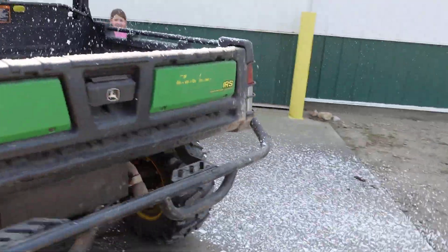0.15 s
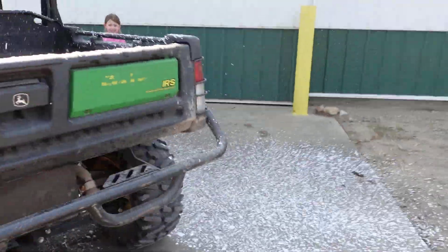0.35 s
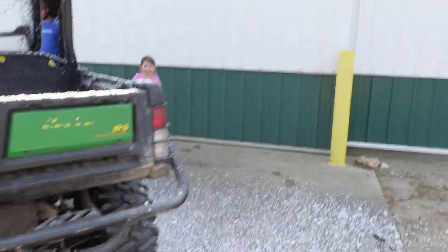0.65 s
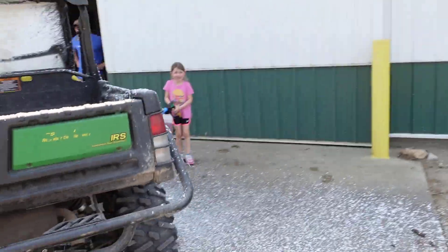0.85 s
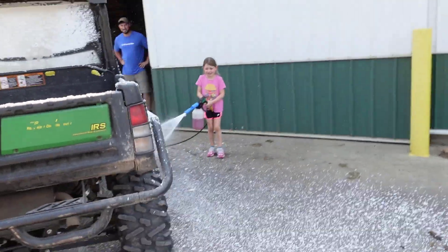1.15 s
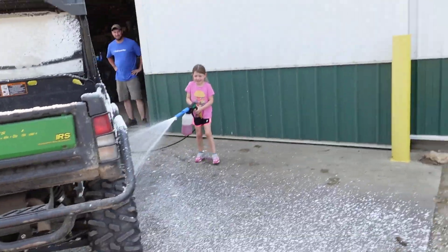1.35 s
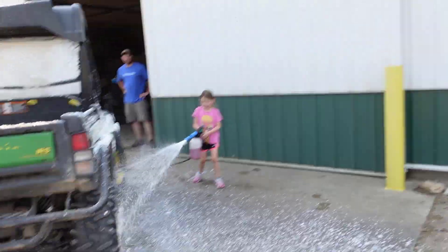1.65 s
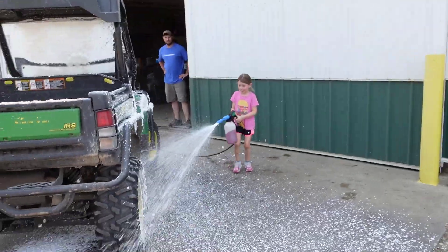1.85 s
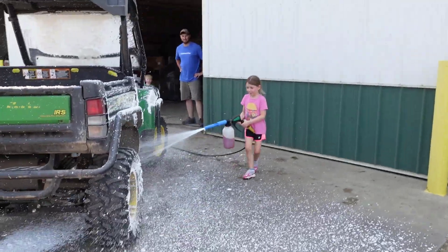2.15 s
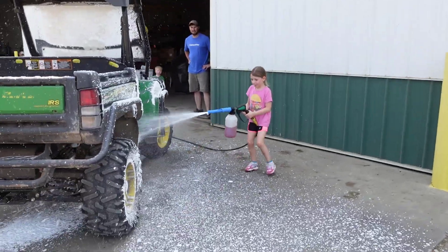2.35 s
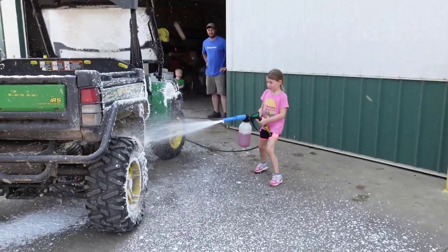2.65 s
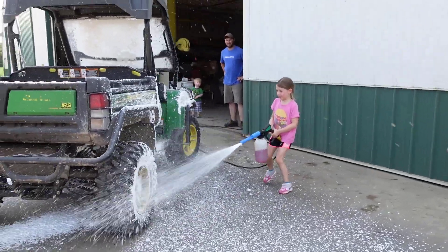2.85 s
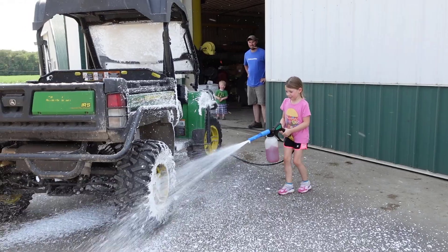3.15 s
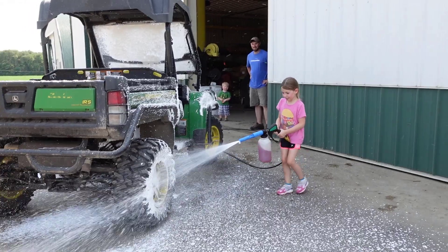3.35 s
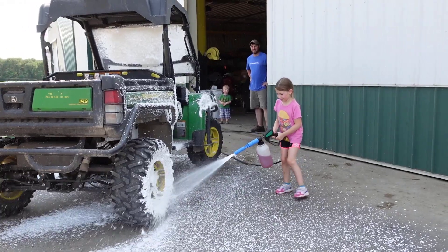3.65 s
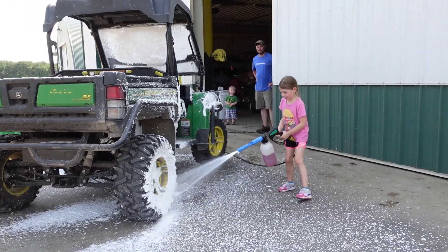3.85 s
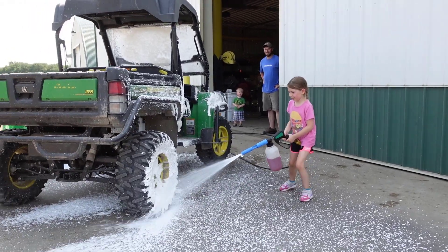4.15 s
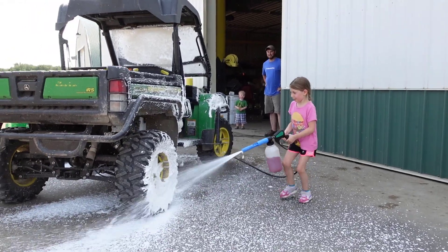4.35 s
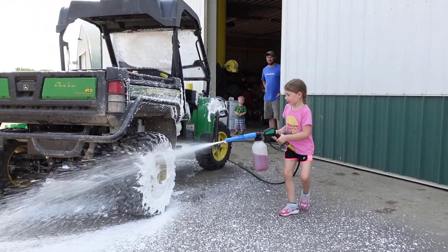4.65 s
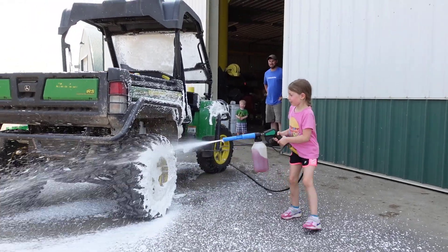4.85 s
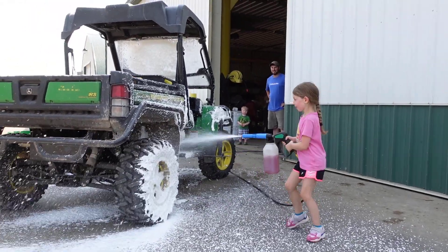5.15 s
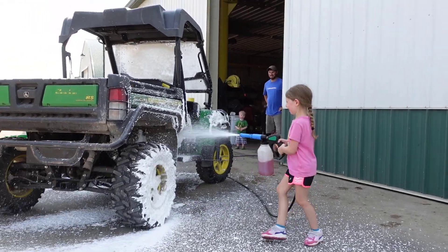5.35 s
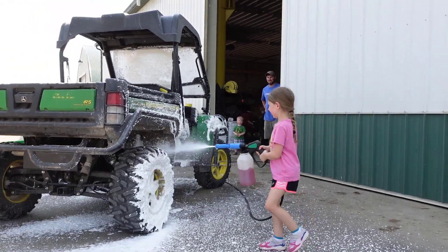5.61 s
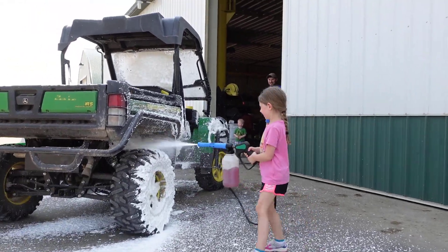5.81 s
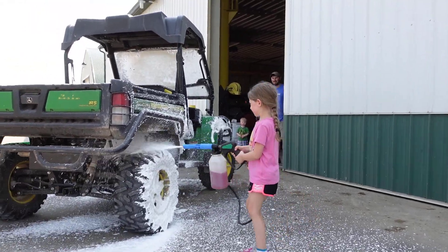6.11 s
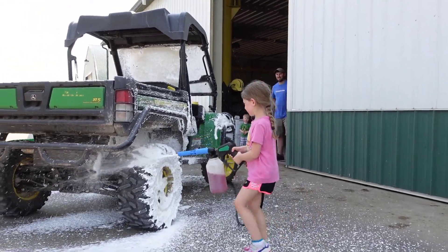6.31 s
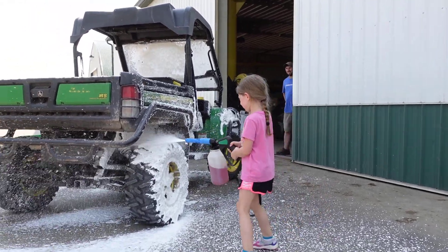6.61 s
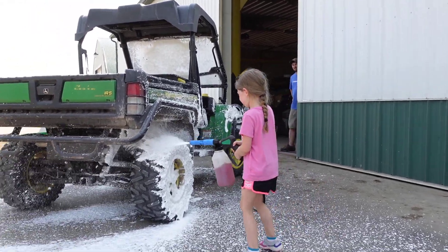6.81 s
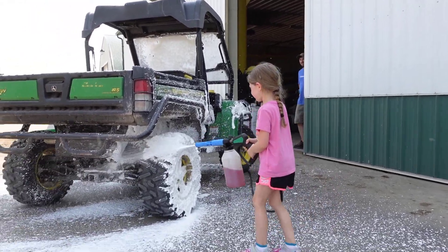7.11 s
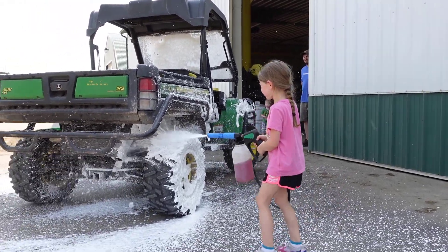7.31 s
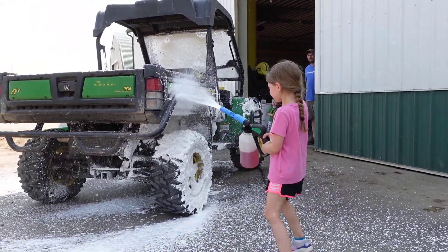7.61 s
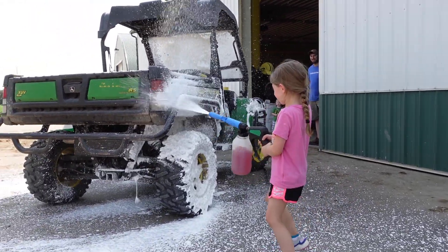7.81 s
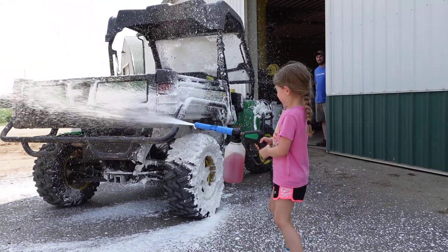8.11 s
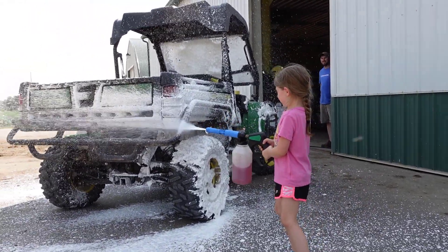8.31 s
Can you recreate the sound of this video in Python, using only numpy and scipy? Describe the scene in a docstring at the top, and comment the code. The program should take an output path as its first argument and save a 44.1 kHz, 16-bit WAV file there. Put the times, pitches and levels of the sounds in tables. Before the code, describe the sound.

A pressure washer's foam lance sprays without pause in a concrete yard, heard a few steps away. Bright hiss and fine fizzing mist dominate, soon roughened by a rapid pump sputter. The water splatters over tyres and plastic panels, with small foam slaps, brief hollow drumming and slight dips when the jet misses. Near reflections give a subtle gliding, phasey colour; the stereo image is nearly central.

```python
"""A concrete yard: a pressure washer's foam lance sweeps over a utility vehicle, a few steps from two microphones.
Pump spurts and uneven clots modulate random drops, filtered into the jet's hiss and its fizzing mist.
Where the jet lands, random drops splash on tyres and panels, drum on hollow plastic and ring resonances.
Three gliding near reflections comb the sound; longer, drifting ones fill the yard and its stereo sides."""
import sys
import numpy as np
from scipy import signal
from scipy.fft import rfft, irfft, next_fast_len
from scipy.io import wavfile
from scipy.ndimage import uniform_filter1d, map_coordinates

SR = 44100
rng = np.random.default_rng(int(sys.argv[2]) if len(sys.argv) > 2 else 0)


def wrap_up_sound(samples):
    """Save the sound to the file named by the first command line argument, as 16-bit audio."""
    columns = np.atleast_2d(samples).T
    # keep every value between -1 and 1, then stretch to whole-number steps
    tamed = np.clip(columns, -1, 1)
    steps = np.round(tamed * 32767).astype(np.int16)
    wavfile.write(sys.argv[1], SR, steps)


N = 373527  # samples

# Sound from the sides. Its tone: pitch_hz, gain_db
SIDE_TONE = [(150, -37), (500, -22), (1100, -35.5), (1900, -63), (3000, -58), (4300, -13), (7000, -12),
             (11000, -12.5), (15000, -30)]
# Its gain before that tone: time_s, gain_db
SIDE_GAIN = [(0, 0.5), (.6, -5.5), (1.3, -14), (2, -7), (5, -7), (5.45, -4), (5.9, -8), (8.47, -6.5)]

# The strongest near reflection, later as the lance is raised: time_s, delay_ms, strength (0-1)
BOUNCE_PATH = [(0, 1.34, .04), (.9, 1.27, .08), (1.0, 1.21, .22), (1.18, 1.155, .28), (1.3, 1.21, .3),
               (1.42, 1.24, .3), (1.58, 1.2, .3), (1.74, 1.2, .3), (1.92, 1.245, .25), (2.05, 1.18, .2),
               (2.16, 1.08, .23), (2.26, 1.1, .21), (2.5, 1.34, .25), (2.6, 1.38, .28), (2.7, 1.34, .28),
               (2.82, 1.21, .25), (2.98, 1.12, .27), (3.22, 1.21, .24), (3.42, 1.16, .13), (3.75, .81, .08),
               (4.28, .79, .13), (4.64, 1.08, .19), (4.88, 1.135, .17), (5.06, 1.08, .14),
               (5.35, 1.18, .13), (5.74, 1.14, .08), (6.05, 1.12, .12), (6.55, 1.06, .09), (7.3, .99, .15),
               (7.5, 1.03, .1), (7.56, 1.62, .1), (7.8, 1.8, .22), (8.1, 1.81, .29), (8.47, 1.6, .18)]
# A shorter path off the vehicle's flank, bending as the lance swings: time_s, delay_ms, strength (0-1)
FLANK_PATH = [(0, .7, .06), (.72, 1.01, .06), (1.8, 1.06, .08), (1.97, 1.0, .12), (2.4, 1.15, .04),
              (2.85, 1.05, .1), (3.1, .98, .08), (3.35, .87, .12), (3.6, .69, .11), (4.2, .5, .08),
              (4.55, .7, .14), (4.78, .935, .2), (4.9, .925, .2), (5.1, .85, .22), (5.33, 1.02, .1),
              (5.74, .98, .11), (6.03, 1.11, .06), (6.42, .99, .09), (6.7, .85, .02), (8.47, .6, .05)]
# A longer, duller path off the wet concrete: time_s, delay_ms, strength (0-1)
GROUND_PATH = [(0, 1.6, .04), (1.1, 1.74, .09), (1.7, 1.76, .09), (2.3, 1.55, .06), (2.9, 1.58, .07),
               (3.05, 1.49, .14), (3.7, 1.35, .07), (4.3, 1.0, .1), (4.76, 1.23, .17), (5.2, 1.24, .12),
               (5.45, 1.3, .14), (5.75, 1.27, .11), (6.02, 1.37, .08), (6.36, 1.26, .15), (7.15, 1.29, .16),
               (7.48, 1.32, .05), (7.75, 1.69, .16), (8.1, 1.7, .15), (8.47, 1.52, .13)]
# What the near surfaces return, on top of the path's strength: pitch_hz, gain_db
SURFACE_TONE = [(380, -13), (700, -3), (1800, .5), (3500, 1), (5500, .8), (7500, -3), (11000, -5),
                (14000, -14)]
# What the wet concrete returns, likewise: pitch_hz, gain_db
GROUND_TONE = [(380, -10), (700, 0), (3500, 0), (5500, -2), (9000, -12)]

# A narrow, bright band gliding as the lance swings: time_s, centre_hz, lift_db
SHEEN_PATH = [(0, 5400, 1), (.9, 5300, .5), (1.1, 6600, 1.5), (2.0, 6300, .5), (2.22, 6100, 2),
              (2.45, 5350, 2.5), (2.72, 5200, 2.5), (3.0, 5520, 2.8), (3.28, 5200, 2.5), (3.7, 6000, 1.3),
              (4.2, 6280, 2.2), (4.5, 5400, 2.5), (4.62, 5550, 1), (5.05, 5750, 1.8), (5.26, 5450, 3),
              (5.4, 5500, .5), (6.1, 6000, 1.2), (6.6, 6700, .5), (7.1, 7080, 2.8), (7.4, 6850, 2.8),
              (7.6, 6800, 0)]
# A narrow hollow drifting lower as the microphones come closer: time_s, centre_hz, change_db
HOLLOW_PATH = [(0, 2900, -.5), (1.3, 2850, -2), (2.1, 3000, -2.5), (2.6, 2650, -1), (3.3, 2750, -2.5),
               (3.65, 3000, -1.5), (4.3, 2900, -1.5), (4.65, 2500, -2.5), (5.1, 2750, -2), (5.8, 2750, -2),
               (7.0, 2620, -2.5), (8.0, 2580, -2), (8.47, 2700, -2.5)]

# Spectral shapes, each scaled to rms 1 before its level is set: pitch_hz, density_db (per Hz)
THRUM_TONE = [(20, -48), (85, -44), (115, -26), (145, -6.5), (200, -1), (260, 3.5), (380, 3), (500, 3.5),
              (900, -11), (4000, -68)]
DRUM_TONE = [(180, -73), (300, -25), (420, -18.5), (510, -10), (590, -2), (700, 1), (850, -1.5),
             (1150, -1.5), (1450, -8.5), (2500, -17.5), (8000, -45)]
SPLASH_TONE = [(300, -60), (800, -17), (1300, -5), (1550, -1.5), (2200, 0.5), (2800, 1), (3600, -2),
               (6000, -12), (12000, -44.5)]
MIST_TONE = [(2500, -57), (6000, -2), (8000, 4.5), (9500, 3.5), (11000, -0.5), (12500, -4.5), (15500, -10)]
JET_TONE = [(600, -69), (1500, -12), (2400, -6.5), (3200, -2), (4100, 0), (5500, 1.5), (7000, -1.5),
            (9000, -10.5), (11000, -20), (15000, -24)]

# The body's low thrum, fading as the microphones are carried round, before trim: time_s, level_db
THRUM_LEVEL_PATH = [(0, -74), (.6, -78.5), (2, -81), (3.2, -80), (4.3, -78), (5.0, -81.5), (5.75, -84.5),
                    (6.1, -89), (7.3, -87.5), (7.85, -96), (8.47, -95)]
# How much of the thrum's deepest part is heard: time_s, share (0-1)
DEEP_SHARE = [(0, 1), (3.45, 1), (3.6, .5), (4.15, .5), (4.3, 1), (4.6, 1), (5, .3), (5.2, 1), (5.8, 1),
              (6.1, .1), (6.55, .5), (6.7, .15), (7.25, .15), (7.45, .6), (7.65, .05), (8.15, .05),
              (8.25, 1), (8.35, .1)]
# The jet crosses a panel or wheel: start_s, length_s, drum_lift_db, splash_lift_db, thrum_lift_db
PANEL_HITS = [(.29, 0.13, 1.5, -0.5, 7), (.85, 0.26, 0, 1.5, 3), (1.78, 0.19, 2, 2.5, 1),
              (2.06, 0.11, -1.5, 0.5, -4), (2.33, 0.14, 0, 3.5, -1), (2.6, 0.23, 2.5, 2.5, 0),
              (2.95, 0.5, 2, 3, 1), (3.42, 0.16, 1.5, 4, 1), (4.22, 0.29, 0.5, 3.5, 2),
              (4.5, 0.3, -0.5, 1, 0), (5.165, 0.63, 4, 4.5, 7.5), (5.69, 0.062, 1.5, 2.5, 1),
              (5.84, 0.16, 2.5, 1, 2), (6.02, .08, 3, 6, -2), (6.17, 0.19, 1, 1, -5), (6.48, .09, 2, -2, 5),
              (6.59, 0.22, 4.5, 3.5, 2), (6.82, 0.11, 1, 1.5, 6), (7.0, 0.15, 4, 2, 5),
              (7.36, 0.096, 3, 2, 7), (7.45, 0.15, 3.5, 3.5, 5), (8.04, 0.28, 4, 1, 3),
              (8.19, 0.08, -0.5, 2, 16)]
# A clot of foam slaps the tread or a panel: time_s, drum_lift_db, splash_lift_db
FOAM_SPLATS = [(.57, 3, -1), (.7, 1, 2), (1.06, 0.5, 3), (1.82, 2, 2.5), (2.13, 4, 2), (2.37, 3, 1),
               (2.63, 0.5, 1), (2.81, 2, 5.5), (3.45, 2, 1), (3.84, 4.5, 5), (4.09, 0, 5), (4.17, 2, 4),
               (4.3, 3, 2), (4.41, 2, 0), (4.66, -3, 0), (5.33, -1, 2), (5.7, 1.5, .5), (6.03, 1, 0),
               (6.21, 5, 3), (6.6, -1, 1), (6.88, 1, 3), (7.55, -1, 3), (7.91, 1, 2), (8.32, 3, 3.5)]
# The jet slips past the vehicle into the open: start_s, length_s, drop_db
OPEN_MISSES = [(-.1, 0.26, 2.5), (1.17, 0.071, 1), (1.41, 0.048, 0.5), (1.6, 0.11, -0.5), (1.98, 0.073, 3),
               (2.69, .07, 1), (3.62, 0.14, 1), (4.0, 0.15, 2), (4.55, .28, 0.2), (4.85, 0.24, 2),
               (6.36, 0.14, 1.5), (7.16, 0.099, 0.5), (7.65, 0.25, 1.5)]
# The jet dwells on a hollow part and rings it: start_s, length_s, resonance_hz, pole_width_hz, level_db
RINGING_DWELLS = [(0.43, 0.59, 990, 169, -58.5), (1.07, 0.99, 990, 190, -62.5),
                  (1.082, 0.8, 1780, 320, -60), (2.057, 0.28, 1910, 300, -56), (2.212, .04, 704, 140, -61),
                  (2.308, 0.15, 687, 150, -57), (2.61, 0.058, 657, 110, -59.5), (2.7, 0.94, 1820, 260, -57),
                  (2.98, 0.61, 790, 240, -66), (4.24, 0.26, 2250, 600, -51), (4.22, 0.23, 1260, 300, -63),
                  (4.423, 0.51, 763, 170, -61.5), (5.163, 0.64, 610, 110, -65.5),
                  (5.214, 0.48, 1000, 230, -56.3), (5.16, 0.55, 1610, 300, -54.5),
                  (5.17, 0.52, 2400, 400, -58), (6.586, 0.16, 1190, 330, -56), (6.59, .18, 1690, 300, -62),
                  (7.44, 0.15, 1080, 300, -59), (7.63, 0.39, 1820, 240, -58),
                  (8.05, 0.36, 1790, 200, -55.5), (7.617, 0.8, 1185, 220, -65),
                  (8.083, 0.29, 646, 200, -58), (7.62, 0.51, 540, 150, -69.5), (8.05, 0.19, 470, 130, -67)]

# The jet grazes an edge and bursts into mist: start_s, length_s, mist_lift_db
EDGE_GRAZES = [(.02, 0.07, 1.5), (.85, 0.17, 1.5), (1.14, 0.17, 3), (1.86, 0.11, 2), (6.17, 0.27, 2),
               (6.72, 0.072, 2.5), (7.06, 0.085, 1.5)]
# The fine mist, before trim: time_s, level_db
MIST_LEVEL_PATH = [(0, -45.5), (.65, -48), (1.5, -46.5), (2.0, -47), (2.1, -51), (2.16, -47), (2.8, -48),
                   (3.35, -47.5), (3.7, -49.5), (4.8, -48.3), (5.55, -50), (5.67, -47.5), (7.9, -46.5),
                   (8.05, -49.3), (8.32, -50), (8.47, -44)]
# The hiss as the lance turns toward and away from the microphones, before trim: time_s, level_db
HISS_LEVEL_PATH = [(0, -42), (.25, -38.5), (.7, -38.5), (1.0, -39.5), (1.15, -43), (1.4, -40),
                   (1.75, -40.5), (2.35, -41), (2.55, -39.5), (2.84, -39), (2.88, -41), (3.05, -40.5),
                   (3.35, -40), (3.7, -37.9), (4.5, -39.5), (5.11, -38), (5.155, -42.5), (5.22, -40),
                   (5.95, -38.5), (6.6, -39), (7.25, -39), (7.8, -39.5), (8.2, -39.5), (8.47, -41)]
# How much the jet sputters: time_s, spurt_power (a spurt's peak over the steady flow)
SPUTTER_POWER = [(0, .6), (.7, 0.85), (1.15, 6.7), (2.1, 5), (2.5, 3.6), (5, 2.3), (5.4, 0.98), (8.4, 2.8)]

PUMP_HZ, DEEP_HZ, TOP_HZ = 75.1, 200, 15750  # mean pump rate, top of the deepest thrum, band limit
DRUM_DB, SPLASH_DB = -58.5, -49.5  # between the hits
SLIDE_ON_S, SLIDE_OFF_S = .045, .035  # the fan of water sliding on and off a part
SPLAT_RISE_S, SPLAT_FALL_S = .008, .055
RING_WANDER = .025  # typical pitch wander, as a share of the resonance


def amp(db):
    """Decibels to gain."""
    return 10 ** (np.asarray(db) / 20)


def unit(x):
    """Scaled to rms 1."""
    return x / np.sqrt(np.mean(x ** 2) + 1e-20)


def colour(points):
    """Gain as a function of frequency, from (Hz, dB) points on a log axis."""
    f, db = np.transpose(points)
    return lambda hz: amp(np.interp(np.log(hz + 1), np.log(f + 1), db))


def curves(rows):
    """One value per sample for each column after the time."""
    s, *cols = np.transpose(rows)
    return [np.interp(np.arange(N) / SR, s, c) for c in cols]


def wobble(rate):
    """A smooth random curve, rate knots a second."""
    knots = rng.standard_normal(int(N * rate / SR) + 4)
    return map_coordinates(knots, [np.arange(N) * rate / SR])


def filtered(x, response):
    """x times a response of frequency."""
    m = next_fast_len(N + SR // 4)  # padded so the filter's tail does not wrap round
    return irfft(rfft(x, m) * response(np.fft.rfftfreq(m, 1 / SR)), m)[..., :N]


def delayed(x, delay_ms):
    """x heard later by a changing delay."""
    return map_coordinates(x, [np.arange(N) - delay_ms * SR / 1000])


def dwell(start, length):
    """How much of the fan of water is on a part, 0-1: it slides on, holds and slides off."""
    t = np.arange(N) / SR - start
    return np.clip(np.minimum(t / SLIDE_ON_S, (length - t) / SLIDE_OFF_S) + .5, 0, 1)


def passes(rows):
    """One dB curve for each column after start and length."""
    start, length, *cols = np.transpose(rows)
    presence = np.array([dwell(s, d) for s, d in zip(start, length)])
    return np.array(cols) @ presence


def patter(flow, response, drops_per_s, drop_share):
    """Like-sized drops over a blur of countless small ones, following the flow and coloured by a response."""
    drops = unit((rng.random(N) < drops_per_s / SR) * np.sign(rng.standard_normal(N)))
    blur = np.sign(rng.standard_normal(N))
    blows = np.sqrt(drop_share) * drops + np.sqrt(1 - drop_share) * blur
    return unit(filtered(blows * flow, response))


def yard(x, first_ms, last_ms, drift_ms, count):
    """Reflections from ground, vehicle and shed wall; their paths drift as lance and microphones move."""
    paths_ms = rng.uniform(first_ms, last_ms, count)
    return sum(delayed(x, ms + drift_ms * wobble(1.2)) for ms in paths_ms) / np.sqrt(count)


def bounced(x):
    """The sound plus its near reflections; wet rough surfaces scatter the treble, so the comb fades up high."""
    sound, power = x, 1
    paths = ((BOUNCE_PATH, SURFACE_TONE), (FLANK_PATH, SURFACE_TONE), (GROUND_PATH, GROUND_TONE))
    for path, surface in paths:
        delay_ms, strength = curves(path)
        sound = sound + strength * delayed(filtered(x, colour(surface)), delay_ms)
        power = power + strength ** 2
    return sound / np.sqrt(power)


def swept(x, path, width_hz):
    """x with one narrow band, shifted to 0 Hz, isolated and shifted back, raised or lowered along a path."""
    hz, db = curves(path)
    turn = np.exp(2j * np.pi * np.cumsum(hz) / SR)
    lowpass = signal.butter(2, width_hz / 2, fs=SR, output="sos")
    band = signal.sosfiltfilt(lowpass, x / turn) * turn
    return x + (amp(db) - 1) * 2 * band.real


def ringing(blows, hz, width_hz):
    """A hollow part's resonance, a double pole; its pitch wanders as the water moves over it."""
    turn = np.exp(2j * np.pi * np.cumsum(hz * (1 + RING_WANDER * wobble(9))) / SR)
    pole = np.exp(-np.pi * width_hz / SR)
    ring = signal.lfilter([1], np.poly([pole, pole]), blows / turn) * turn
    return unit(ring.real)


def splats():
    """Lift of the drumming and of the splash in dB: each clot lands fast and runs off."""
    s, *lifts = np.transpose(FOAM_SPLATS)
    age = np.maximum(np.arange(N) / SR - s[:, None], 0)
    shape = np.minimum(age / SPLAT_RISE_S, 1) * np.exp(-(age / SPLAT_FALL_S) ** 2)
    return np.array(lifts) @ shape


def vehicle():
    """The water splashes on tyres and panels, drums on hollow plastic and rings the body's resonances."""
    drum_lift, splash_lift, thrum_lift = passes(PANEL_HITS)
    drum_splat, splash_splat = splats()
    landing_db = 0.27 * wobble(10) - passes(OPEN_MISSES)[0]  # how much of the jet lands on the vehicle
    drum_db = DRUM_DB + drum_lift + drum_splat + landing_db + 0.38 * wobble(26)
    splash_db = SPLASH_DB + splash_lift + splash_splat + landing_db + 0.91 * wobble(30)
    thrum_db = curves(THRUM_LEVEL_PATH)[0] - 0.5 + thrum_lift + landing_db + 2.3 * wobble(16)
    flow = amp(0.53 * wobble(36) + 1.15 * wobble(120) + 0.9 * wobble(400))

    splash = amp(splash_db) * patter(flow, colour(SPLASH_TONE), drops_per_s=1800, drop_share=0.45)
    drum = amp(drum_db) * patter(flow, colour(DRUM_TONE), drops_per_s=500, drop_share=0.3)
    thrum = amp(thrum_db) * patter(flow, colour(THRUM_TONE), drops_per_s=300, drop_share=0.33)
    deep = filtered(thrum, lambda hz: 1 / (1 + (hz / DEEP_HZ) ** 20))
    sound = splash + drum + thrum - (1 - curves(DEEP_SHARE)[0]) * deep

    blow_tone = colour([(150, -50), (300, -13), (480, -2)])
    blows = patter(flow, blow_tone, drops_per_s=540, drop_share=0.26)
    for start, length, hz, width_hz, db in RINGING_DWELLS:
        sound = sound + amp(db) * dwell(start, length) * ringing(blows, hz, width_hz)
    return sound


def pump_flow(between=0.69, jitter_s=0.001, size_spread=0.25, peak_s=0.00031):
    """The jet's strength: each pump turn throws a short spurt, with a weaker one halfway to the next."""
    turns = np.cumsum(PUMP_HZ * (1 + .012 * wobble(4))) / SR
    at = np.flatnonzero(np.diff(np.floor(2 * turns)))
    chance = rng.uniform(-0.84, 1, (len(at), 2))
    weak = np.arange(len(at)) % 2
    shift_s = chance[:, 0] * jitter_s * (1 + 2 * weak)  # weak spurts are three times less punctual
    at = np.clip(at + (shift_s * SR).astype(int), 0, N - 1)
    sizes = np.where(weak, between, 1) * np.abs(1 + size_spread * chance[:, 1])
    u = np.arange(SR // 100) / SR / peak_s
    spurts = np.abs(signal.fftconvolve(np.bincount(at, sizes, N), u * np.exp(1 - u))[:N])
    power = 1 + curves(SPUTTER_POWER)[0] * spurts
    # spurts bunch the water up; the mean flow stays the same
    return np.sqrt(power / uniform_filter1d(power, SR // 5))


def nozzle():
    """Foam leaves the lance in spurts and uneven clots; the jet hisses and its fine mist fizzes."""
    jet_db = curves(HISS_LEVEL_PATH)[0] - 0.68 + 0.93 * wobble(300)
    mist_db = curves(MIST_LEVEL_PATH)[0] + 2.5 + passes(EDGE_GRAZES)[0]
    mist_db = mist_db + 0.27 * wobble(11) + 1.22 * wobble(160)
    clots = amp(0.74 * wobble(36) + 0.18 * wobble(110))
    flow = pump_flow() * clots
    jet = amp(jet_db) * patter(flow, colour(JET_TONE), drops_per_s=6000, drop_share=0.2)
    mist = amp(mist_db) * patter(flow, colour(MIST_TONE), drops_per_s=6700, drop_share=0.16)
    return jet + mist


def scene():
    """Both close microphones hear nearly the same; only sound arriving from the sides differs between them."""
    source = swept(nozzle() + vehicle(), SHEEN_PATH, width_hz=170)
    source = swept(source, HOLLOW_PATH, width_hz=350)
    dull = filtered(source, colour([(500, -8.5), (2000, -14.0), (5000, -12.5), (12000, -17.5)]))
    early = yard(dull, first_ms=4, last_ms=16, drift_ms=0.698, count=4)
    mid = amp(-0.68) * (bounced(source) + early)
    late = yard(source, first_ms=18, last_ms=43, drift_ms=1.7, count=2)
    side = amp(curves(SIDE_GAIN)[0]) * filtered(late, colour(SIDE_TONE))
    return np.array([mid + side, mid - side])


def record(dry):
    """The microphones' signal keeps nothing above its band limit."""
    return filtered(dry, lambda hz: hz < TOP_HZ)


dry = scene()
out = record(dry)
wrap_up_sound(out)
```